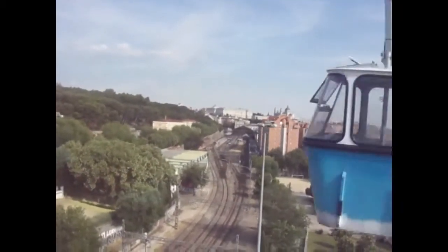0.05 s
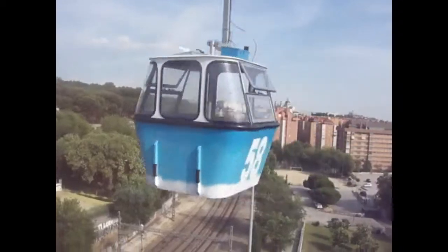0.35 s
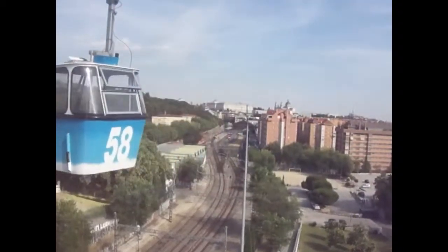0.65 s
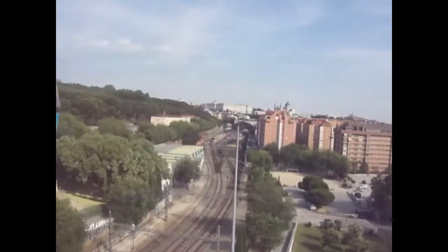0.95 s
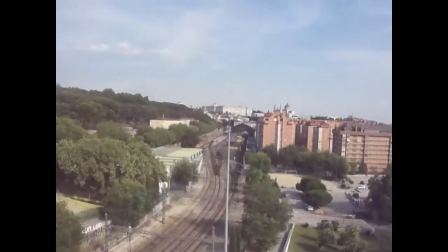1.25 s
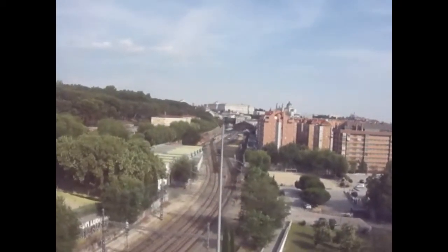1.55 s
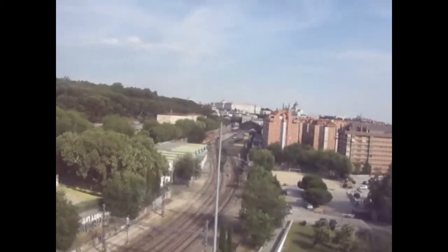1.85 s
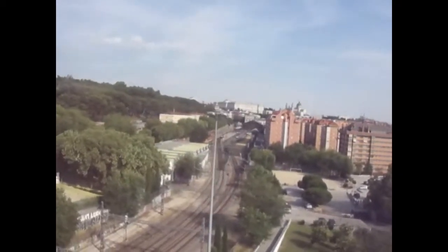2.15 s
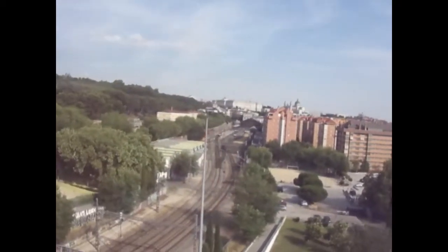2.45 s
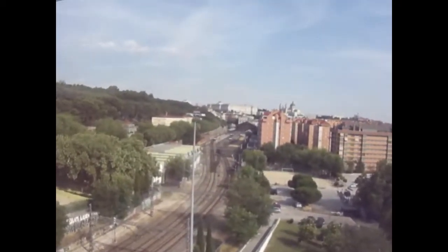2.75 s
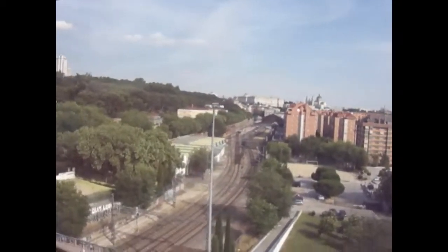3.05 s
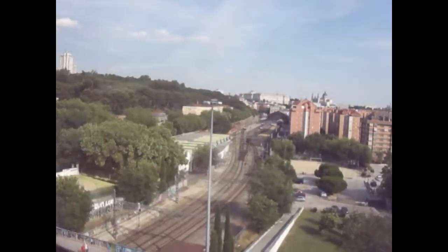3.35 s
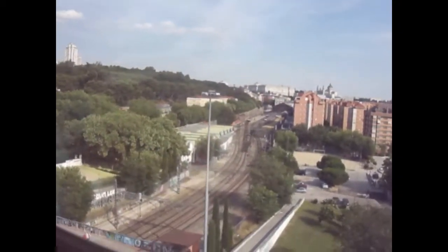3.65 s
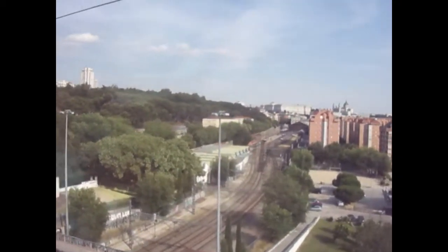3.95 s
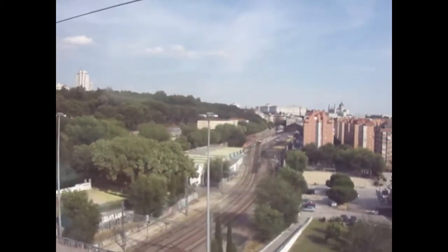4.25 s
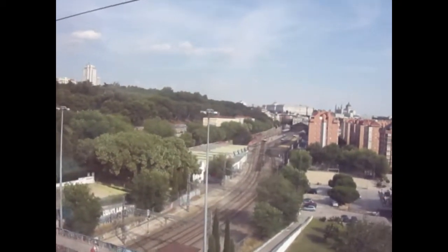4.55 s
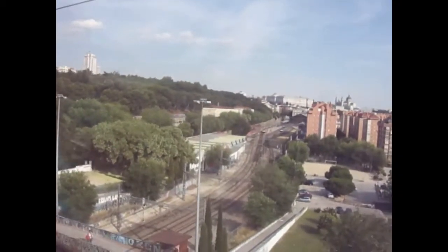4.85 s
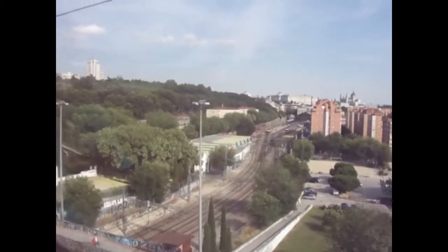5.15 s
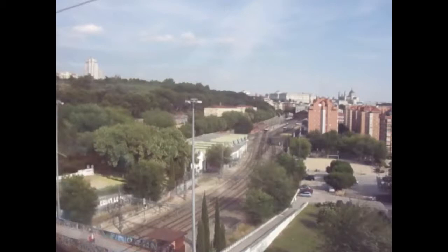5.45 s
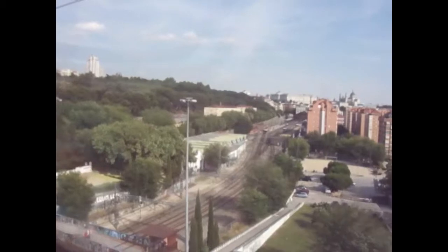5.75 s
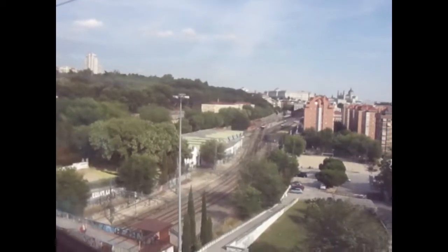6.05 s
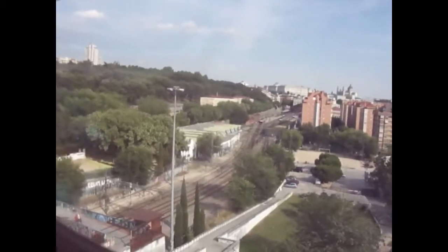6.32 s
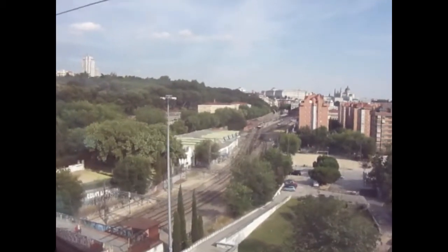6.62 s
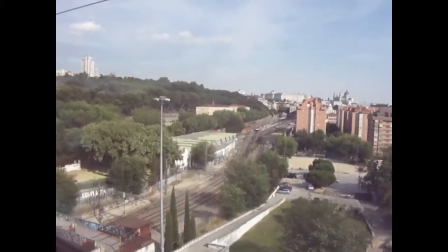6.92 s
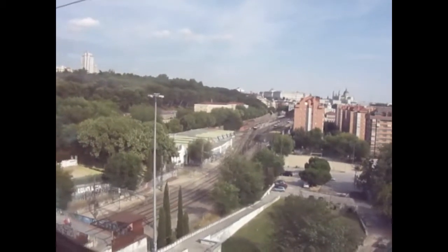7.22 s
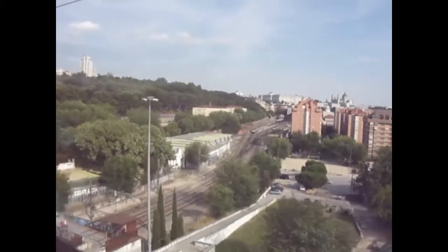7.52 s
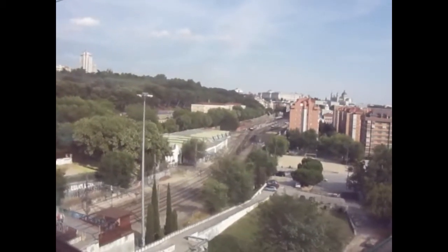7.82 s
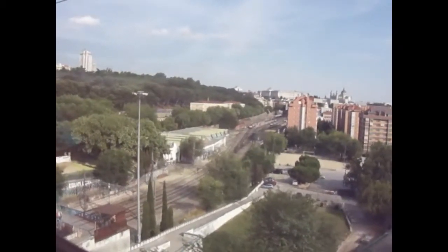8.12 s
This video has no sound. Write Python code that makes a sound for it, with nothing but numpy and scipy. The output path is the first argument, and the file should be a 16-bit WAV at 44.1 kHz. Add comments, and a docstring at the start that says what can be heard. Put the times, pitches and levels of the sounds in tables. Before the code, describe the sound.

Gusty wind buffets the microphone at a cable car's open window, crackling and popping, while a brief whoosh crosses from right to left.

```python
"""Wind in a moving cable car

Wind at the open window buffets the two microphone openings (ports) of a small stereo camera.
Swirls of air (eddies) rumble and flutter; the hardest slaps overload the input and briefly narrow
the stereo sound. Small ticks come through the roar, and a broad whoosh sweeps from right to left."""
import sys
import numpy as np
from scipy.fft import rfft, irfft, next_fast_len
from scipy.io import wavfile
from scipy.ndimage import uniform_filter1d, map_coordinates

SR = 44100
rng = np.random.default_rng(int(sys.argv[2]) if len(sys.argv) > 2 else 0)


def int16_out(signal):
    """Quantize to a 16-bit WAV file."""
    q = np.round(np.clip(np.atleast_2d(signal).T, -1, 1) * 32767)
    wavfile.write(sys.argv[1], SR, q.astype(np.int16))


N = 360738
TIME = np.arange(N) / SR

# Wind strength at the ports. Each row: time in seconds, then rumble, buffeting and fizz in dB.
WIND_LEVELS = [(0, -17, -22, -44), (0.28, -24.5, -21.5, -41), (0.4, -26.5, -26.5, -45),
               (0.85, -26, -26, -46.5), (0.98, -21, -21, -44), (1.9, -22.5, -20, -42.5),
               (2.3, -23, -19.5, -39.5), (2.6, -22, -20.5, -41), (3.45, -20.5, -22.5, -43),
               (3.68, -22, -22.5, -46), (4.15, -24, -21.5, -45), (4.25, -22, -18, -40),
               (4.7, -22, -19.5, -40), (5.17, -23, -17.5, -34.5), (5.45, -21.5, -17, -37),
               (5.72, -21.5, -16, -35.5), (6.1, -21, -17.5, -37.5), (6.6, -22, -18.5, -39.5),
               (7.05, -20.5, -18.5, -39), (7.5, -20.5, -20, -43.5), (7.85, -20.5, -17.5, -43),
               (8.18, -21, -19.5, -46)]
# Hard slaps of air. Each row: time in seconds, strength in dB, seconds the stereo stays narrow.
HARD_SLAPS = [(0.299, 2.5, 0.036), (0.517, -3, 0.038), (0.717, -0.5, 0.038), (0.843, -7, 0.032),
              (0.9583, 0.5, 0.008), (0.991, 3.5, 0.014), (1.649, 0, 0.03), (1.838, 5.5, 0.002),
              (1.852, 2.5, 0.004), (1.904, -1.5, 0.032), (2.088, 3.5, 0.012), (2.147, 1.5, 0.004),
              (2.211, 3, 0.025), (2.422, -2, 0.063), (2.6478, 7, 0.049), (2.7666, 2.5, 0.002),
              (2.8825, 7, 0.092), (3.0704, 3, 0.057), (4.208, -5.5, 0.024), (4.2874, 7, 0.093),
              (4.42, 2, 0.022), (4.749, 2, 0.055), (5.101, 5, 0.003), (5.647, 6, 0.023),
              (5.971, 0.5, 0.004), (6.04, 5.5, 0.003), (6.423, 4, 0.005), (6.445, 2, 0.014),
              (6.46, 2.5, 0.002), (6.5739, 6.5, 0.028), (6.651, -3.5, 0.022), (6.719, 0.5, 0.004),
              (6.789, 1, 0.022), (6.912, 0, 0.005), (7.022, -1, 0.003), (7.051, 1.5, 0.06),
              (7.183, 4, 0.008), (7.265, 0.5, 0.032), (7.349, 3.5, 0.002), (7.391, 1, 0.015),
              (7.519, 3, 0.057), (7.6348, 3.5, 0.098), (7.888, -2, 0.004), (8.094, -1.5, 0.016)]


def amp(db):
    """Turn decibels into a gain."""
    return 10 ** (np.asarray(db) / 20)


def unit(x):
    """Scale a signal to an average (rms) level of 1."""
    return x / np.sqrt(np.mean(x ** 2) + 1e-20)


def along(points, hz):
    """Read between (Hz, value) points on a logarithmic frequency scale."""
    freqs, values = np.transpose(points)
    return np.interp(np.log(hz + 1), np.log(freqs + 1), values)


def curves(rows):
    """Turn each column after the time into one value per sample."""
    times, *columns = np.transpose(rows)
    return [np.interp(TIME, times, column) for column in columns]


def wobble(rate):
    """A smooth curve through `rate` random values a second."""
    return map_coordinates(rng.standard_normal(int(N * rate / SR) + 4), [TIME * rate])


def filtered(x, response):
    """Scale each frequency in x by the gain response(hz)."""
    size = next_fast_len(N + 8192)
    return irfft(rfft(x, size) * response(np.fft.rfftfreq(size, 1 / SR)), size)[..., :N]


def noise(tone, alike):
    """Stereo noise; `alike` pairs Hz with how well left and right match (1 same, -1 opposite)."""
    def shape(hz):
        angle = np.arccos(np.clip(along(alike, hz), -1, 1)) / 2
        return amp(along(tone, hz)) * [np.cos(angle), np.sin(angle)]
    mid, side = filtered(rng.standard_normal((2, N)), shape)
    return unit(np.array([mid + side, mid - side]))


def moments(rate, level_db):
    """Random times, `rate` a second on average, crowding where the level is high."""
    due = np.cumsum(amp(level_db))
    return np.interp(rng.random(round(rate * N / SR)), due / due[-1], TIME)


def held(start, length, rise_s, fall_s):
    """A curve that rises from 0 towards 1, holds and falls back."""
    gate = np.zeros(N)
    near = slice(max(0, round((start - .1) * SR)), round((start + length + .1) * SR))
    t = TIME[near] - start
    gate[near] = (np.tanh(t / rise_s) - np.tanh((t - length) / fall_s)) / 2
    return gate


def bursts(hits, rise_s, decay_s):
    """A loudness curve that jumps up at each (seconds, dB) hit and dies away."""
    envelope = np.zeros(N + SR)
    t = np.arange(SR // 50) / SR
    shape = np.tanh(t / rise_s) ** 2 * np.exp(-t / decay_s)
    for start, db in hits:
        envelope[round(start * SR):][:len(t)] += amp(db) * shape / shape.max()
    return envelope[:N]


def capped(gain, top_db):
    """Let a gain level off softly below a ceiling."""
    return gain / np.hypot(1, gain / amp(top_db))


def cabin_air(waver_db=0.05):
    """Air hisses evenly round the moving cabin."""
    # Each row: time in seconds, level in dB.
    levels = [(0, -39.5), (0.42, -46), (0.62, -37), (1.2, -40), (2, -45.5), (2.8, -45), (3.3, -44.5),
              (4.3, -38.5), (5.2, -43), (6.5, -49.5), (8.18, -43.5)]
    # Each row: frequency in Hz, level in dB.
    tone = [(100, -3), (600, 2.5), (1500, -1.5), (3000, -13), (5000, -23), (6800, -25), (10000, -37.5),
            (15500, -53)]
    level_db, = curves(levels)
    return amp(level_db + waver_db * wobble(11)) * noise(tone, alike=[(500, 0.99), (6000, 0.95)])


def whoosh(waver_db=1.0, treble_hz=2500):
    """A broad rush swells, brightest as it arrives, crosses from right to left and fades."""
    # Each row: time in seconds, level in dB, left minus right in dB, added treble in dB.
    sweep = [(2.9, -53.5, -15, 2.5), (3.13, -49.5, -10.5, 5.5), (3.3, -42, -10, 3.5),
             (3.43, -43, -12.5, 1.5), (3.57, -34, -9, 1.5), (3.62, -29.5, -6.5, 2.5),
             (3.67, -27.5, -6.5, 2.5), (3.705, -29.5, -4, -2.5), (3.74, -25.5, -3.5, 0.5),
             (3.79, -25.5, -1, 0), (3.83, -27, 1, -2), (3.88, -32, 2.5, -2), (3.95, -35.5, 4.5, -0.5),
             (4.1, -40, 2, -2), (4.5, -52.5, 0.5, 0.5)]
    # Each row: frequency in Hz, level in dB.
    tone = [(150, -18.5), (400, 4), (750, 5), (1200, 1.5), (2000, -1), (3200, -10.5), (6000, -19.5),
            (9000, -27.5), (12000, -37), (15500, -44.5)]
    level_db, pan_db, treble_db = curves(sweep)
    sides = amp(np.array([pan_db, -pan_db]) / 2)
    rush = noise(tone, alike=[(400, 1.0), (3000, 0.89)])
    treble = filtered(rush, lambda hz: hz ** 2 / (hz ** 2 + treble_hz ** 2))
    return amp(level_db + waver_db * wobble(30)) * sides * (rush - treble + amp(treble_db) * treble)


def clicks():
    """Tiny bursts of bright noise make thin clicks."""
    # Each row: start in seconds, peak level in dB.
    hits = [(1.837, -42), (2.8814, -37), (4.2862, -38), (6.4535, -40.5), (6.5725, -38.5), (7.517, -43),
            (7.6331, -39.5)]
    # Each row: frequency in Hz, level in dB.
    tone = [(1000, -11), (5000, -9), (15500, -10.5)]
    return bursts(hits, rise_s=0.0002, decay_s=0.0012) * noise(tone, alike=[(8000, 0.5)])


def ticks(patter_per_s=24, over_fizz_db=4.5, scatter_db=2.5, crack_db=-31.5, lead_s=0.0013):
    """Short dry cracks: one on each hard slap, some alone, and a patter that thickens with the fizz."""
    # Each row: start in seconds, peak level in dB.
    sharp_ticks = [(1.415, -25), (1.605, -25.5), (2.238, -26), (2.343, -28.5), (2.764, -31), (2.9068, -23),
                   (2.988, -26), (3.005, -29), (4.6254, -26.5), (4.813, -23.5), (5.07, -26), (5.1313, -24),
                   (5.166, -21), (5.179, -24), (5.291, -24.5), (5.297, -27), (5.578, -27), (5.635, -22.5),
                   (5.671, -20.5), (5.7018, -16), (5.704, -15), (5.7105, -19), (5.721, -20), (5.739, -25),
                   (5.77, -22), (5.806, -22.5), (6.164, -22.5), (6.169, -22.5), (6.2467, -28.5),
                   (6.5722, -21.5), (7.082, -26.5), (7.164, -24.5), (7.372, -29), (7.383, -27),
                   (7.606, -28.5), (7.647, -28.5)]
    # Each row: frequency in Hz, level in dB.
    tone = [(150, -4), (400, 10.5), (1200, 12), (2500, -0.5), (4500, -5.5), (8000, -17), (11000, -26.5),
            (15500, -42)]
    _, _, fizz_db = curves(WIND_LEVELS)
    times = moments(patter_per_s, 1.1 * fizz_db)
    levels = np.interp(times, TIME, fizz_db) + over_fizz_db + scatter_db * rng.standard_normal(len(times))
    cracks = [(time - lead_s, crack_db + 1.3 * db) for time, db, _ in HARD_SLAPS]
    hits = [*cracks, *sharp_ticks, *zip(times, levels)]
    return bursts(hits, rise_s=0.00028, decay_s=0.0015) * noise(tone, alike=[(3000, 0.048)])


def surges(edge_s=0.0058):
    """Large, slow eddies make the rumble swell and sag; gives the change in dB."""
    # Each row: start in seconds, change in dB, length in seconds.
    eddies = [(0.424, -3, 0.13), (0.527, -3, 0.13), (0.706, 4, 0.044), (0.79, -3, 0.08),
              (0.936, 4.5, 0.047), (1.87, 3.5, 0.176), (2.166, -3.5, 0.026), (2.48, -3, 0.08),
              (2.803, -10, 0.034), (2.878, 5.5, 0.06), (3.013, -7.5, 0.021), (3.16, 3.5, 0.044),
              (3.568, -7, 0.06), (3.705, -4.5, 0.13), (3.908, 4.5, 0.061), (4.13, -2.5, 0.061),
              (4.246, 3, 0.094), (4.556, -2, 0.15), (4.715, 2.5, 0.051), (5.047, 2.5, 0.17),
              (5.21, -3, 0.028), (6.601, 1, 0.12), (7.457, -5.5, 0.06)]
    return sum(db * held(start, length, edge_s, edge_s) for start, db, length in eddies)


def puffs(swirl_per_s=55, swirl_db=3):
    """Strong eddies arrive suddenly, hold and let go; weaker ones swirl in between."""
    # Each row: start in seconds, wind change in dB (a lull if below 0), length in seconds,
    # added fizz in dB.
    eddies = [(0.145, -19, 0.0069, -2), (0.183, 5, 0.04, -2), (0.229, 8.5, 0.016, 7), (0.273, 5, 0.033, 4),
              (0.303, 4, 0.082, 6), (0.4, -2.5, 0.03, -12), (0.453, 8.5, 0.064, 3.5),
              (0.524, -5.5, 0.04, 2), (0.743, 8, 0.029, 1), (0.846, -8, 0.029, 0), (0.877, 4, 0.025, 4),
              (0.928, 5, 0.014, -4.5), (0.95, 4.5, 0.04, -2), (1.069, 6, 0.012, 2), (1.196, 8, 0.016, 3.5),
              (1.33, 6, 0.015, 3.5), (1.376, 3.5, 0.07, 5), (1.454, 3.5, 0.07, 0), (1.551, -13, 0.015, 4),
              (1.567, 7, 0.01, 0), (1.602, 6, 0.012, 3), (1.826, 3, 0.035, 3.5), (1.996, 2.5, 0.048, 5.5),
              (2.224, -10, 0.022, -7), (2.229, 6.5, 0.061, 2), (2.331, 8.5, 0.02, 1.5),
              (2.57, 3, 0.094, 4.5), (2.707, 3.5, 0.024, -1), (2.758, 7.5, 0.021, -5),
              (2.797, -3.5, 0.044, -1), (2.859, 6.5, 0.017, 4), (2.876, 8, 0.0067, 3),
              (2.97, 7.5, 0.039, 1.5), (3.023, -5.5, 0.032, -12), (3.152, 5, 0.017, 3.5),
              (3.263, 5.5, 0.032, 8.5), (3.363, 6.5, 0.027, 5), (3.53, 7, 0.021, 4), (3.679, 11, 0.018, -1),
              (4.021, 8.5, 0.021, 5.5), (4.088, -9.5, 0.112, 6), (4.198, 10.5, 0.012, -4),
              (4.24, 2.5, 0.053, -2), (4.411, 4.5, 0.015, 7), (4.447, 1.5, 0.053, 0.5),
              (4.552, -3, 0.035, -2), (4.622, 7.5, 0.018, 1), (4.649, 5.5, 0.025, 2),
              (4.718, 2.5, 0.028, 2.5), (4.881, 3.5, 0.053, 3), (5.052, 5, 0.14, 0),
              (5.254, 2, 0.036, -2.5), (5.308, -3.5, 0.026, -12), (5.456, -4.5, 0.097, 3.5),
              (5.598, 5.5, 0.055, -0.5), (5.654, -3.5, 0.011, -12), (5.668, 3.5, 0.03, 7),
              (5.698, 5.5, 0.078, 3.5), (5.827, -4, 0.037, 1), (5.87, 3, 0.027, 4.5), (5.928, 8, 0.016, 1),
              (5.949, -1.5, 0.04, 0), (6.029, 2.5, 0.066, 3.5), (6.151, 7.5, 0.034, 3),
              (6.217, -2.5, 0.017, -4.5), (6.352, -4, 0.064, 3.5), (6.282, 5.5, 0.017, -2),
              (6.43, 3.5, 0.02, -2.5), (6.58, -9.5, 0.022, -5), (6.652, -2.5, 0.031, -2.5),
              (6.687, 1.5, 0.03, 0.5), (6.731, -5, 0.024, 0.5), (6.848, 1.5, 0.11, -1.5), (7, 6, 0.035, -3),
              (7.163, 3, 0.043, -2.5), (7.341, 6, 0.016, -2), (7.369, 8, 0.023, 3), (7.513, 5, 0.01, -1.5),
              (7.775, 1.5, 0.04, 2.5), (7.89, 3, 0.032, -3), (7.98, 3, 0.044, 2)]
    lift_db, rasp_db = np.zeros((2, N))
    for start, db, length, fizz_db in eddies:
        gate = held(start, length, rise_s=0.0013, fall_s=0.0018)
        lift_db += db * gate
        rasp_db += fizz_db * gate
    return lift_db + swirl_db * np.tanh(wobble(swirl_per_s)), rasp_db


def wind(flutter_db=4.5, grit_db=2.5, crackle_db=2.5, fizz_top_db=-23, tear_db=-14):
    """Slow pressure reaches both ports alike; the buffeting of small eddies sounds in opposite ways in left and
    right, and fizzes."""
    # The tone of each layer. Each row: frequency in Hz, level in dB.
    rumble_tone = [(15, -12.5), (28, -8), (43, -2.5), (55, -1), (72, 1.5), (100, 1.5), (160, -1.5),
                   (220, -7.5), (300, -13.5), (600, -37), (1500, -48.5), (4000, -79)]
    buffet_tone = [(20, -19), (60, -28.5), (120, -7), (200, 0), (350, 1.5), (500, -3.5), (750, -9),
                   (1100, -18), (2000, -36), (4000, -59), (9000, -82)]
    fizz_tone = [(200, -30.5), (700, -0.5), (1300, 2.5), (2200, -6), (4000, -17.5), (7000, -29.5),
                 (10000, -39.5), (15500, -49.5)]
    tear_tone = [(1000, -19), (2500, 1), (4500, 0.5), (7500, -7.5), (11000, -27.5), (15500, -31.5)]
    # Each row: frequency in Hz, left-right match from -1 to 1.
    buffet_alike = [(100, -0.1), (350, -0.84), (600, -0.7), (1500, -0.58)]
    # Each row: frequency in Hz, left minus right in dB.
    balance = [(30, 0), (55, 2), (90, -5), (140, -5.5), (210, -6), (320, -2), (490, 2), (740, 1.5),
               (1200, 0.5), (3000, -1.5), (8000, -3.5)]
    rumble_db, buffet_db, fizz_db = curves(WIND_LEVELS)
    lift_db, rasp_db = puffs()
    eddy_db = flutter_db * np.tanh(wobble(110)) + grit_db * wobble(280)
    rumble_gain = amp(rumble_db + surges() + 0.24 * lift_db + wobble(40))
    rumble = rumble_gain * noise(rumble_tone, alike=[(100, 0.97)])
    buffet_gain = capped(amp(buffet_db + lift_db), top_db=-10) * unit(amp(eddy_db))
    buffet = buffet_gain * noise(buffet_tone, buffet_alike)
    # The fizz breaks into fine crackle, which runs together in the hardest gusts.
    crackle = unit(amp(0.94 * eddy_db + crackle_db * wobble(500)))
    fizz_gain = capped(amp(fizz_db + lift_db + rasp_db) * crackle, fizz_top_db)
    fizz = fizz_gain * noise(fizz_tone, alike=[(1200, -0.62), (5000, -0.14)])
    # Near its ceiling it brightens into a tearing hiss.
    tear = amp(tear_db - fizz_top_db) * fizz_gain ** 2 * noise(tear_tone, alike=[(4000, 0)])
    sides = lambda hz: amp(np.outer([1, -1], along(balance, hz)) / 2)
    return filtered(rumble + buffet + fizz + tear, sides)


def overloads(small_per_s=2.5, small_db=-1, narrow_s=0.0079):
    """List the hard slaps, plus small random ones that come with the buffeting."""
    _, buffet_db, _ = curves(WIND_LEVELS)
    small_slaps = [(time, small_db, narrow_s) for time in moments(small_per_s, buffet_db)]
    return [*HARD_SLAPS, *small_slaps]


def narrowed(x, hits, narrow_db=-22, recover_s=0.0037):
    """After a slap the difference between left and right drops away, then creeps back."""
    shut = np.zeros(N + SR)
    t = np.arange(SR // 5) / SR
    for start, _, hold_s in hits:
        shut[round(start * SR):][:len(t)] += (1 - np.tanh((t - hold_s) / recover_s)) / 2
    width = amp(narrow_db * uniform_filter1d(np.minimum(shut[:N], 1), size=32))
    mid, side = (x[0] + x[1]) / 2, width * (x[0] - x[1]) / 2
    return np.array([mid + side, mid - side])


def slaps(hits, pitch_hz=327, pitch_spread=0.19, build_s=0.0015, stop_s=0.00023, port_lag_s=0.0002):
    """A swing, opposite in left and right, grows fast and stops dead at the input's limit."""
    t = np.arange(-SR // 50, 0) / SR  # the swing leads up to the slap's time
    out = np.zeros((2, N + len(t)))
    port_t = np.array([t, t - port_lag_s])
    for (time, db, _), (detune, sign) in zip(hits, rng.standard_normal((len(hits), 2))):
        hz = pitch_hz * np.exp(pitch_spread * detune)
        swing = np.sin(2 * np.pi * hz * port_t) * np.exp(port_t / build_s)
        out[:, round(time * SR):][:, :len(t)] += np.sign(sign) * amp(db) * swing * np.tanh(-t / stop_s)
    return out[:, len(t):] * [[1], [-1]]


def scene():
    """Wind on the ports over the sounds from outside."""
    stream = wind() + cabin_air() + whoosh()
    hits = overloads()
    return narrowed(stream, hits) + slaps(hits) + ticks() + clicks()


def record(dry, ceiling=0.48, hardness=8, top_hz=15800):
    """The input squashes the hardest gusts, softens the treble and passes nothing above top_hz."""
    # Each row: frequency in Hz, gain in dB.
    roll_off = [(9000, 0.5), (15500, -0.5)]
    clipped = dry / (1 + np.abs(dry / ceiling) ** hardness) ** (1 / hardness)
    return filtered(clipped, lambda hz: amp(along(roll_off, hz)) * (hz < top_hz))


dry = scene()
out = record(dry)
int16_out(out)
```